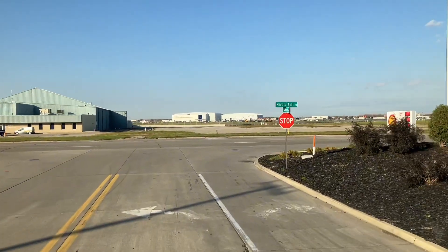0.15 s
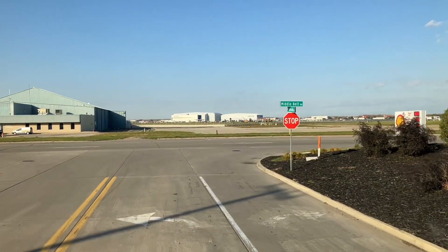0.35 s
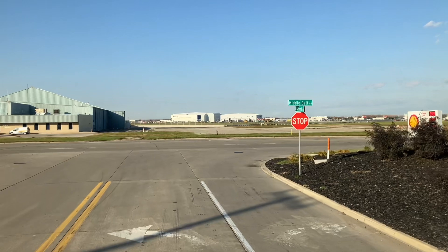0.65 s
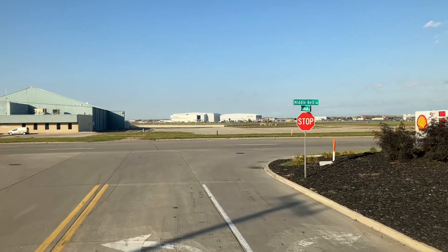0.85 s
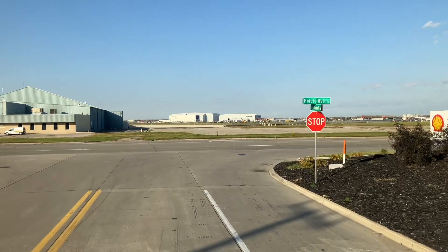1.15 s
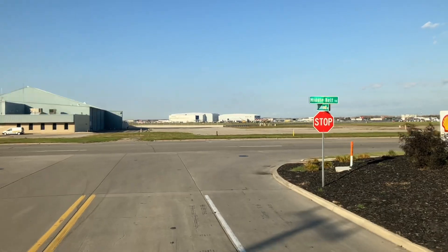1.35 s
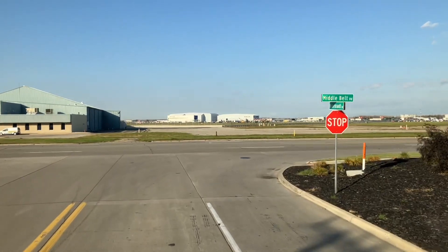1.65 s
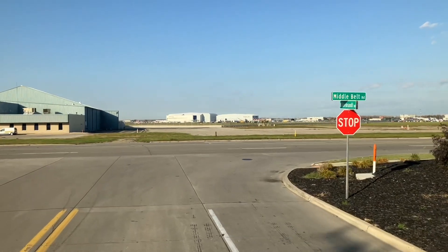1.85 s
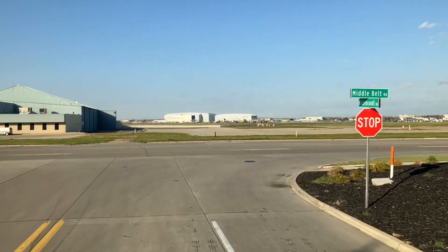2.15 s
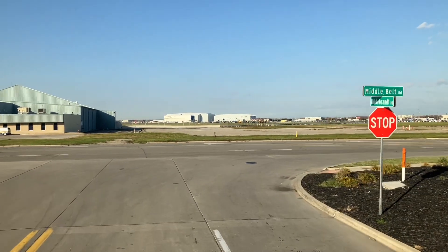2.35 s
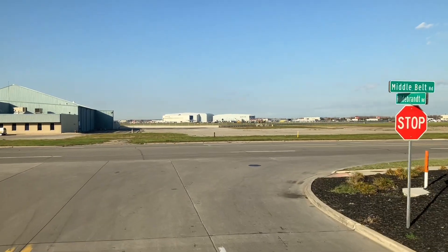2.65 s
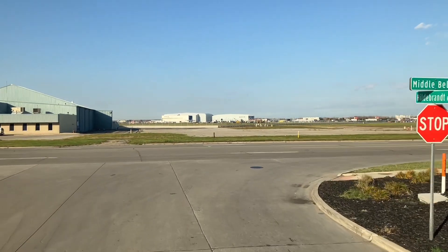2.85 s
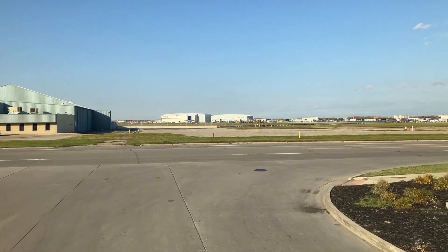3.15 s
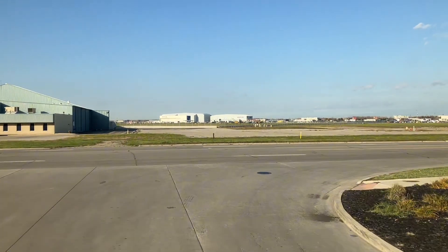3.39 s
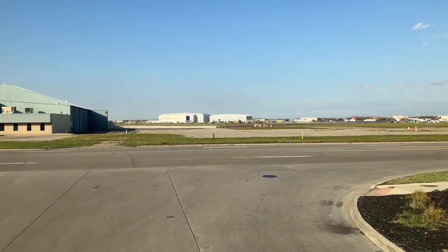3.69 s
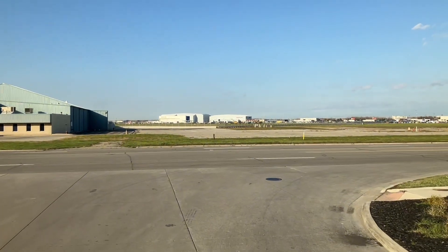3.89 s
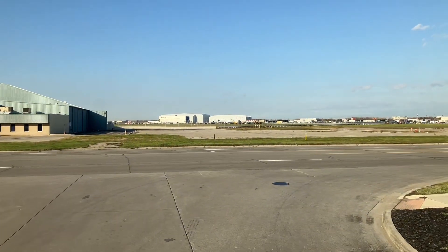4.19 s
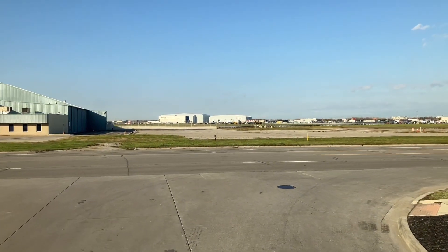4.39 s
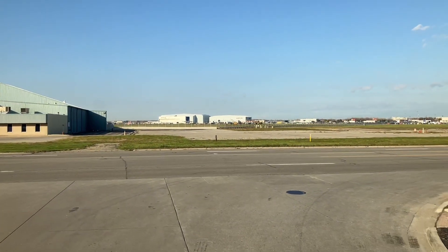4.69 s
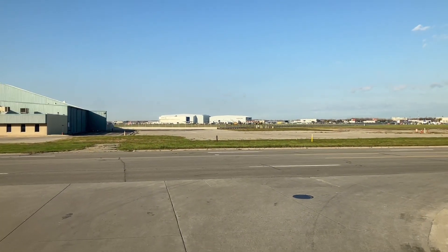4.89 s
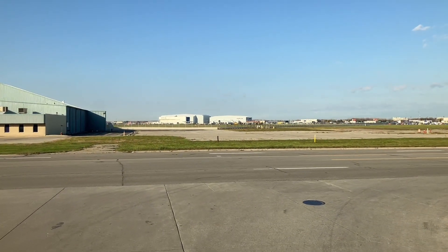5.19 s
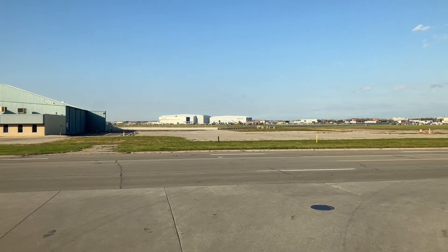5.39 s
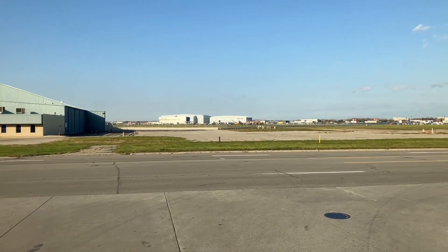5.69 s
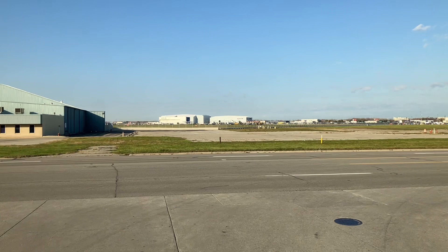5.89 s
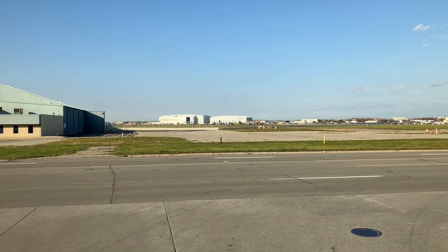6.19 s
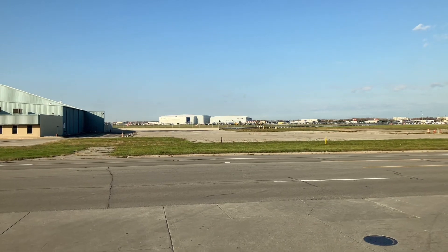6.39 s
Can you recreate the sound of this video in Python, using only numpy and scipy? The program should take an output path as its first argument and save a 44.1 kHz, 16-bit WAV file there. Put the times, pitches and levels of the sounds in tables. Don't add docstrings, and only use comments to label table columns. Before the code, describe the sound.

Inside a slowing truck cab, a low diesel boom drops in pitch under steady indicator ticking, then one short two-note air horn blast at the end.

```python
import sys
import numpy as np
from scipy import signal
from scipy.fft import rfft, irfft, next_fast_len
from scipy.io import wavfile
from scipy.ndimage import uniform_filter1d, map_coordinates

SR = 44100
rng = np.random.default_rng(int(sys.argv[2]) if len(sys.argv) > 2 else 0)


def invert_db(level):
    return 10 ** (np.asarray(level, dtype=float) / 20)


def wrap_up_sound(samples):
    columns = np.atleast_2d(samples).T
    tamed = np.clip(columns, -1, 1)
    steps = np.round(tamed * 32767).astype(np.int16)
    wavfile.write(sys.argv[1], SR, steps)


N = 288414
T = np.arange(N) / SR

# time_s, firing_hz
FIRING_RATE = [(0, 61), (.4, 61.5), (.7, 59.5), (1.07, 52.5), (1.3, 49.4), (1.75, 49.2), (2.1, 48),
               (2.3, 46.5), (2.55, 46.1), (2.68, 48), (2.82, 46.4), (3.27, 45.2), (3.6, 44.6), (3.9, 43),
               (4.85, 39.8), (5.25, 38.4), (6.54, 35.5)]
# time_s, level_db
FIRING_LEVEL = [(0.0, -25), (0.1, -22.5), (0.35, -28.5), (0.7, -21.5), (1.17, -19.5), (1.3, -13.5),
                (1.75, -12), (2.15, -15), (2.52, -14), (2.62, -25), (2.73, -20.5), (2.78, -17.5),
                (3.1, -14.5), (3.6, -10.5), (4.2, -15.5), (4.45, -20.5), (5.85, -25.5), (6.04, -34)]
# frequency_hz, rms_db
SHELL_RESPONSE = [(25, -45.5), (45, -27.5), (70, -27.5), (92, -27.5), (120, -39), (145, -45.5), (165, -38),
                  (195, -38), (225, -38), (260, -36), (300, -50), (340, -55.5), (420, -87)]
LUMPY_DB, STEADY_S = 5, 1.1

LOW_HZ, HIGH_HZ = 351.0, 390.5
# left_db, right_db, left_lead_rad
LOW_PARTIALS = [(-20, -14, 1.6), (-25, -30, -2.4), (-21, -26, -.6), (-30, -34, -2.2), (-31, -33, -2.8),
                (-30, -36, -.5), (-53, -48, .9), (-39, -43, -2.1), (-43, -40, .2), (-46, -43, .4),
                (-44, -61, -.1), (-53, -46, -.2), (-49, -49, .8), (-63, -53, 2.9), (-59, -47, -1.3),
                (-62, -70, 2.6), (-57, -48, 1.9), (-63, -49, -1.1), (-60, -64, 0), (-51, -52, 0),
                (-58, -59, 0), (-61, -61, 0)]
HIGH_PARTIALS = [(-32, -21, -1.4), (-23, -22, 1.5), (-47, -42, -3.1), (-28, -30, 2.3), (-25, -30, -1.8),
                 (-34, -38, -2.8), (-44, -38, .9), (-44, -40, -.2), (-45, -45, .2), (-43, -42, -.8),
                 (-50, -52, 1.2), (-46, -47, 1.1), (-66, -50, .3), (-64, -58, 2.7), (-54, -54, -3.0),
                 (-54, -53, -.4), (-56, -57, 2.6), (-51, -51, 0), (-63, -64, 0), (-58, -60, 0),
                 (-57, -58, 0), (-65, -65, 0), (-56, -56, 0)]
# held_db, rise_db_per_s, overshoot_db, sag_db_per_s, fall_db_per_s
HORN_LAYERS = [
    (-13, 400, 2.5, 2, 215),
    (-15.5, 1300, 2, 11, 420),
    (-34, 200, 2, 8, 420),
]
# frequency_hz, density_db_per_hz
AIR_SPECTRUM = [(300, -43), (600, 2.5), (2000, 7.5), (4000, 7.5), (7500, 4), (9000, 6), (13000, -13.5),
                (16000, -14.5)]
# start_s, end_s, from_hz, to_hz, level_db
VALVE_SQUEAKS = [
    (6.014, 6.036, 7050, 7150, -46),
    (6.034, 6.048, 7150, 7300, -52),
    (6.031, 6.05, 3620, 3640, -45),
    (6.05, 6.062, 3640, 3650, -47),
    (6.036, 6.056, 1880, 1920, -46),
    (6.515, 6.56, 5900, 5450, -64),
]
OPEN_S, FULL_S, SHUT_S = 6.02, 6.079, 6.323
SETTLE_S = 0.0094

# mode_hz, left_db, right_db, t60_s
TICK_MODES = [(2050, -2.5, -5, 0.049), (2697, 3.5, -6.5, 0.09), (2960, -19.5, 3, 0.055),
              (3250, -3.5, -11, 0.079), (3530, 2, 6.5, 0.0098), (4330, -5, -17, 0.06),
              (4440, -9, 3.5, 0.011), (5360, -3.5, -5.5, 0.031), (5750, -21, -10.5, 0.019)]
# mode_hz, left_db, right_db, t60_s
TOCK_MODES = [(642, 16.5, 11.5, 0.018), (1053, 10.5, 4, 0.014), (2136, -3.5, -4.5, 0.09),
              (2412, 0.5, 2, 0.061), (3000, 3.5, 3, 0.013), (3355, -3, -7, 0.06), (3750, -22, -4, 0.022),
              (4190, -8, -16.5, 0.051), (4600, -10, -10.5, 0.02), (5520, -8, -4, 0.016)]
FIRST_TICK_S, BLINK_S, ON_S = .172, .64, .3185
TICK_DB, TOCK_DB = -30.5, -32
KNOCK_S = .007

# time_s, peak_db, centre_hz, t60_s
TRIM_SNAPS = [
    (1.028, -74, 3950, 0.035),
    (1.616, -53, 4160, 0.03),
    (2.233, -40, 5360, 0.075),
    (2.523, -44, 5560, 0.026),
    (2.62, -32, 9700, .04),
    (3.801, -40, 3860, 0.017),
]

# start_s, end_s, from_hz, to_hz, level_db
DRONE_GLIDES = [(-.2, .55, 185, 187, -29), (.1, .7, 216, 213, -33), (.55, 1.25, 214, 178, -28),
                (1.15, 2.2, 198, 195, -31), (2.3, 2.6, 173, 171, -30), (2.8, 3.4, 165, 158, -35),
                (3.1, 3.8, 262, 258, -33), (3.2, 3.9, 200, 192, -35), (4.6, 5.5, 355, 328, -39),
                (4.1, 6.7, 73, 67, -27), (5.0, 6.1, 203, 189, -37), (1.1, 2.3, 75, 73, -29)]
# start_s, end_s, from_hz, to_hz, level_db
WHINE_GLIDES = [(2.9, 5.25, 7900, 6000, -64), (4.4, 6.0, 4750, 3900, -71), (5.19, 5.3, 4370, 4300, -62),
                (5.47, 5.64, 4230, 4110, -64), (1.05, 1.4, 6500, 6400, -72), (1.8, 3.0, 6350, 5700, -71),
                (.55, 1.0, 10330, 10350, -61), (.2, 1.0, 9480, 9470, -68), (.95, 1.25, 10950, 10200, -70),
                (2.1, 2.4, 9800, 9000, -70), (2.4, 2.62, 9050, 9650, -71), (.83, 1.02, 2330, 2310, -62),
                (2.42, 2.75, 2600, 2660, -64), (3.35, 4.1, 10700, 10100, -70), (3.55, 4.3, 7350, 6770, -62),
                (4.6, 5.1, 9500, 9050, -70), (5.4, 6.0, 9200, 8850, -72)]

# time_s, level_db
ROAD_LEVEL = [
    (0, -1),
    (.45, -1),
    (1.1, -4),
    (1.8, -2),
    (2.3, -4.5),
    (3.6, -5.5),
    (4.3, -6.5),
    (6.0, -7.5),
]
# frequency_hz, density_db_per_hz
RUMBLE_SPECTRUM = [(22, -61), (33, -19), (50, 9), (70, 6), (100, 0), (140, -4), (200, -5), (260, -9.5),
                   (400, -22), (600, -60)]
# frequency_hz, density_db_per_hz
ROAR_SPECTRUM = [(160, -36.5), (280, -1.5), (306, -2), (338, 0), (392, -7.5), (422, -3), (455, -5),
                 (788, -10), (892, -17), (1020, -10), (1480, -16), (1720, -23.5), (2270, -27.5),
                 (5500, -47), (7150, -62), (12100, -120)]
# frequency_hz, density_db_per_hz
HISS_SPECTRUM = [(2500, -39.5), (4000, -0.5), (6000, 1), (7000, 2.5), (7800, 1.5), (10300, 0.5),
                 (12500, -0.5), (15500, -16), (17000, -22.5)]
# frequency_hz, correlation_ratio
LIKENESS = [(60, 0.73), (130, 0.56), (290, 0.68), (500, 0.085), (900, 0.1), (1700, 0.46), (3000, 0.083),
            (6000, 0.05)]
RUMBLE_DB, RUMBLE_GROWS, ROAR_DB = -22, 1, -27
HISS_DB, HISS_GROWS, HISS_PER_LOAD, HISS_SWAY_DB = -55.5, 0.58, 0.15, 1.2
BOOST_DB, BOOST_FADES_S = 4, 0.88
LIGHT_DB = -15.5

# frequency_hz, t60_s
CABIN_DECAY = [(300, 0.085), (1500, 0.3), (8000, 0.099)]
LEFT_LAG_S = .00021
DUCK_DB, DUCK_START_S, DUCK_FALL_S, DUCK_END_S, DUCK_RISE_S = -9, 6.04, 0.13, 6.43, 0.12


def engine():
    cycle_hz = curves(FIRING_RATE)[0] / 6
    cycle = 2 * np.pi * np.cumsum(cycle_hz) / SR
    firing_db, = curves(FIRING_LEVEL)
    lumps_db = (1.6 + LUMPY_DB * (1 - ramp(STEADY_S, 0.13))) * wobble(12)
    boom = invert_db(firing_db + 2.5 + lumps_db) * np.sin(6 * cycle)

    load_db = RUMBLE_GROWS * curves(ROAD_LEVEL)[0][::10] + 2.15
    orders = 0
    for order in [*range(4, 6), *range(7, 40)]:
        rank_db = 4.5 if order % 6 == 0 else 1.5 if order % 3 == 0 else -4.5
        shell_db = along(SHELL_RESPONSE, order * cycle_hz[::10])
        level_db = shell_db + rank_db + load_db + 2.35 * wobble(2.474)[::10]
        phase = .5 * wobble(4)[::10] + rng.uniform(0, 2 * np.pi)
        orders = orders + invert_db(level_db) * np.sin(order * cycle[::10] + phase)
    orders = signal.resample_poly(orders, 10, 1)[:N]
    return (boom + orders) * invert_db([[-.6], [.6]])


def horn():
    first = round(OPEN_S * SR)
    t = T[first:]
    base_db, over_db, air_db = [swell(t, *layer) for layer in HORN_LAYERS]
    open_valve = np.clip((t - t[0]) / 0.033, 0, 1) * np.clip((6.47 - t) / 0.018, 0, 1)
    out = np.zeros((2, len(t)))
    reeds = ((LOW_HZ, LOW_PARTIALS, .6, -2.6), (HIGH_HZ, HIGH_PARTIALS, .15, -2.2))
    for f0, partials, start, scoop in reeds:
        start = start + scoop * np.exp(-(t - 6.035) / 0.028)
        partials = partials + [(-59 - .5 * k, -59 - .5 * k, 0) for k in range(18)]
        cycle = 2 * np.pi * f0 * t + start + 0.024 * wobble(36)[first:]
        for k, (left, right, lead) in enumerate(partials):
            if k == 0:
                gain_db = base_db + 17.5
            elif k == 1:
                gain_db = 0.32 * (base_db + 12.5) + 0.45 * (over_db + 26)
            else:
                gain_db = (over_db + 20.5) * (1 + 0.0097 * k)
            spread = rng.uniform(0, 2 * np.pi) * (k > 0) + np.array([[lead], [-lead]]) / 2
            level_db = np.array([[left], [right]]) + 0.5 + gain_db
            out += invert_db(level_db) * np.sin((k + 1) * cycle + spread)
    out *= 1 + 0.11 * np.cos(2 * np.pi * (HIGH_HZ - LOW_HZ) * t - .3)
    low_puffs = .8 * np.sin(2 * np.pi * LOW_HZ * t + .6)
    high_puffs = .8 * np.sin(2 * np.pi * HIGH_HZ * t + .15)
    out += invert_db(air_db - 3) * (1 + low_puffs + high_puffs) * rush(AIR_SPECTRUM, patchy_db=2)[:, first:]
    return np.pad(out * open_valve, ((0, 0), (first, 0))) + glides(VALVE_SQUEAKS, flutter_db=3)


def swell(t, held_db, rise, over_db, sag, fall):
    since_full = np.maximum(t - FULL_S, 0)
    held = held_db + over_db * np.exp(-since_full / SETTLE_S) - sag * since_full
    return held - rise * np.maximum(FULL_S - t, 0) - fall * np.maximum(t - SHUT_S, 0)


def indicator():
    ticks, tocks = blinks(FIRST_TICK_S, TICK_DB), blinks(FIRST_TICK_S + ON_S, TOCK_DB)
    closing = relay(ticks, TICK_MODES, rise=0.0028, scatter=0.088)
    return closing + relay(tocks, TOCK_MODES, rise=0.003, scatter=0.1)


def relay(events, modes, rise, scatter):
    t, blows = T[:SR // 8], np.zeros(N)
    ring = 0
    for hz, left, right, t60 in modes:
        since = np.maximum(t - KNOCK_S * (hz < 900), 0)
        level_db = np.array([[left], [right]]) - 60 * since / min(t60, .035)
        ring = ring + invert_db(level_db) * np.sin(2 * np.pi * hz * since)
    ring = ring * (1 - np.exp(-t / .0015))
    surfaces = rng.standard_normal((2, len(t))) * invert_db(-60 * t / scatter) * (1 - np.exp(-t / rise))
    direct = 0.4 * signal.unit_impulse(len(t), SR // 300)
    click = signal.fftconvolve(ring, surfaces / np.linalg.norm(surfaces[0]) + direct, axes=1)
    click = signal.sosfilt(signal.butter(8, 6100, fs=SR, output="sos"), click)
    for s, db in events:
        blows[round((s - .002) * SR)] = invert_db(db + 3.0)
    return signal.fftconvolve(blows[None], click, axes=1)[:, :N]


def blinks(first, db):
    return [(s, db) for s in np.arange(first, N / SR - .4, BLINK_S)]


def rattles():
    out, t = np.zeros((2, N)), T[:SR // 10]
    for s, db, hz, t60 in TRIM_SNAPS:
        band = signal.butter(1, [0.68 * hz, min(1.3 * hz, 20000)], "bandpass", fs=SR)
        snap = signal.lfilter(*band, rng.standard_normal((2, len(t))))
        out[:, round(s * SR):][:, :len(t)] += invert_db(db - 60 * t / t60) * snap
    return out


def drones():
    return glides(DRONE_GLIDES, flutter_db=4.0)


def whines():
    return glides(WHINE_GLIDES, flutter_db=4.0)


def glides(rows, flutter_db):
    out = np.zeros(N)
    for start, end, from_hz, to_hz, db in rows:
        span = slice(max(round(start * SR), 0), round(end * SR))
        u = (T[span] - start) / (end - start)
        hz = (from_hz + (to_hz - from_hz) * u) * (1 + 0.0029 * wobble(48)[span])
        level = invert_db(db + 2.0 + flutter_db * wobble(16)[span]) * np.abs(np.sin(np.pi * u)) ** 0.4
        out[span] += level * np.sin(2 * np.pi * np.cumsum(hz) / SR)
    return out


def cab_noise():
    road_db, = curves(ROAD_LEVEL)
    load_db = uniform_filter1d(curves(FIRING_LEVEL)[0], size=SR // 3) - LIGHT_DB
    rumble_db = RUMBLE_DB + RUMBLE_GROWS * road_db + 2.1 * wobble(5)
    rumble = invert_db(rumble_db) * rush(RUMBLE_SPECTRUM, patchy_db=0.0)
    roar_db = ROAR_DB + road_db + 0.17 * wobble(6)
    roar = invert_db(roar_db) * rush(ROAR_SPECTRUM, patchy_db=1.55) * invert_db([[.7], [-.7]])
    boost_db = BOOST_DB * (1 - ramp(BOOST_FADES_S, .15))
    hiss_db = HISS_DB + HISS_GROWS * road_db + boost_db + HISS_PER_LOAD * load_db
    hiss = invert_db(hiss_db + HISS_SWAY_DB * wobble(9)) * rush(HISS_SPECTRUM, patchy_db=1.1)
    return rumble + roar + hiss


def rush(spectrum, patchy_db):
    z = signal.stft(rng.standard_normal((2, N)), nperseg=512)[2]
    field = uniform_filter1d(rng.standard_normal(z.shape[1:]), size=6, axis=0)
    field = uniform_filter1d(field, size=14, axis=1)
    pair = signal.istft(z * invert_db(patchy_db * unit(field)), nperseg=512)[1][:, :N]

    def response(hz):
        turn = np.arccos(np.clip(along(LIKENESS, hz), -1, 1)) / 2
        return invert_db(along(spectrum, hz)) * [np.cos(turn), np.sin(turn)]

    mid, side = filtered(pair, response)
    return unit(np.array([mid + side, mid - side]))


def cabin(x):
    hz, t, z = signal.stft(rng.standard_normal((2, SR // 3)), SR, nperseg=256)
    decay = invert_db(-60 * t / along(CABIN_DECAY, hz)[:, None])
    tail = signal.istft(z * decay, SR, nperseg=256)[1]
    return signal.fftconvolve(x, tail / np.linalg.norm(tail[0]), axes=1)[:, :N]


def ear_lag(x):
    sides = np.array([[-1], [1]])
    return filtered(x, lambda hz: np.exp(1j * np.pi * np.minimum(hz, 4800) * LEFT_LAG_S * sides))


def filtered(x, response):
    edge = 2048
    m = next_fast_len(N + 2 * edge)
    x = np.pad(x, [(0, 0)] * (x.ndim - 1) + [(edge, m - N - edge)], "reflect")
    return irfft(rfft(x) * response(np.fft.rfftfreq(m, 1 / SR)), m)[..., edge:edge + N]


def wobble(rate):
    coarse = T[::100]
    knots = rng.standard_normal(int(N * 60 / SR) + 4)
    return np.interp(T, coarse, map_coordinates(knots, [coarse * min(rate, 59)]))


def curves(rows):
    s, *cols = np.transpose(rows)
    return [np.interp(T, s, c) for c in cols]


def along(points, hz):
    f, v = np.transpose(points)
    return np.interp(np.log(hz + 1), np.log(f + 1), v)


def ramp(start, length):
    return np.clip((T - start) / length, 0, 1)


def unit(x):
    return x / np.sqrt(np.mean(x ** 2) + 1e-20)


def scene():
    blast = horn()
    clicks = indicator() + rattles()
    steady = ear_lag(engine() + drones() + cab_noise()) + whines()
    duck_db = DUCK_DB * (ramp(DUCK_START_S, DUCK_FALL_S) - ramp(DUCK_END_S, DUCK_RISE_S))
    return invert_db(duck_db) * steady + clicks + blast + invert_db(-26.5) * cabin(blast)


def low_pass(x):
    return signal.sosfilt(signal.butter(12, 17080, fs=SR, output="sos"), x)


def record(dry):
    def share(hz):
        return np.clip((hz - 5800) / 1200, 0, 1)

    def lag(hz):
        angle = np.pi * (hz - 6900) / 4300
        return np.array([np.cos(angle), np.sin(angle)])

    quadrature = np.array([[1], [-1j]])
    pair = filtered(dry.mean(0), lambda hz: share(hz) * lag(hz) * (hz < 15800) * quadrature)
    hz, _, z = signal.stft(pair, SR, nperseg=2048)
    waver = np.repeat(rng.standard_normal((2, 65, z.shape[2])), 16, axis=1)[:, :len(hz)]
    bar = .45 + .15 * (hz[:, None] > 12000) + .17 * waver
    kept = np.abs(lag(hz))[..., None] > np.maximum(bar, .3)
    mid, side = signal.istft(z * kept, SR, nperseg=2048)[1][:, :N]
    x = filtered(dry, lambda hz: np.sqrt(1 - share(hz) ** 2)) + [mid + side, mid - side]
    x = x / (1 + np.abs(x / 1.3) ** 3) ** (1 / 3)
    x = x * np.clip(np.minimum(T, T[::-1]) / .004, 0, 1)
    return low_pass(x)


dry = scene()
out = record(dry)
wrap_up_sound(out)
```